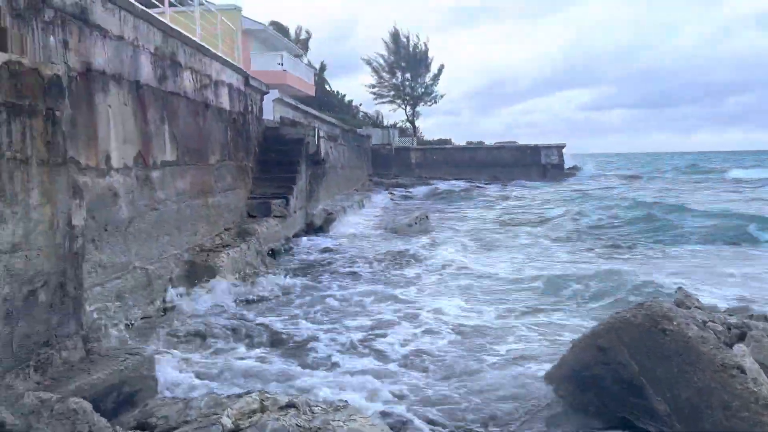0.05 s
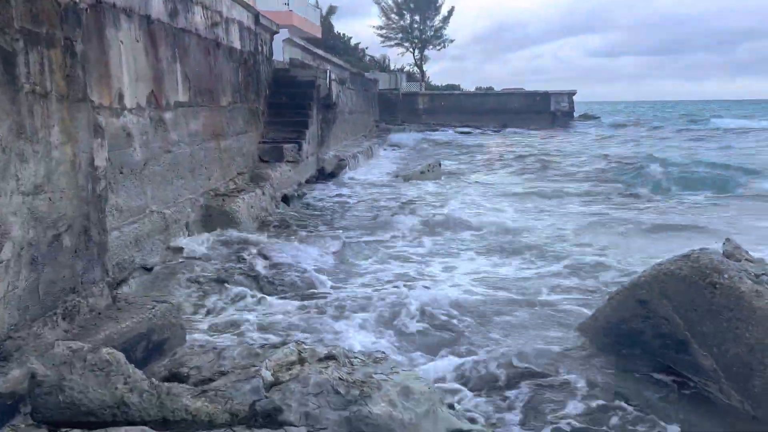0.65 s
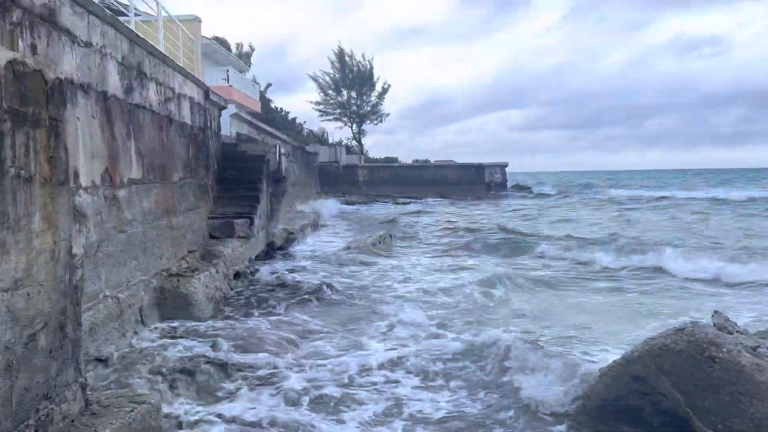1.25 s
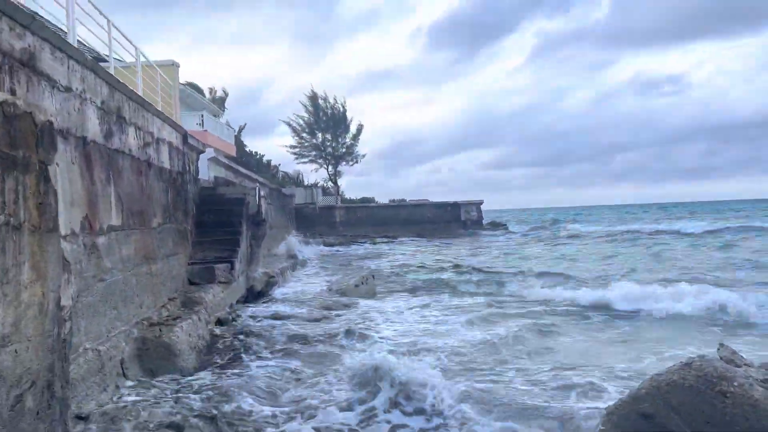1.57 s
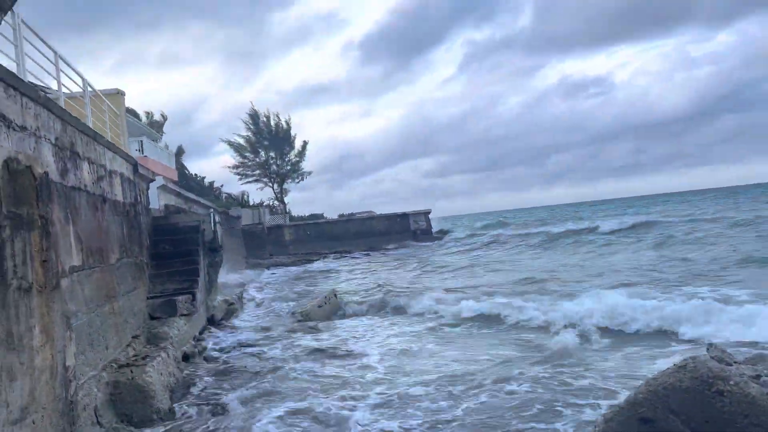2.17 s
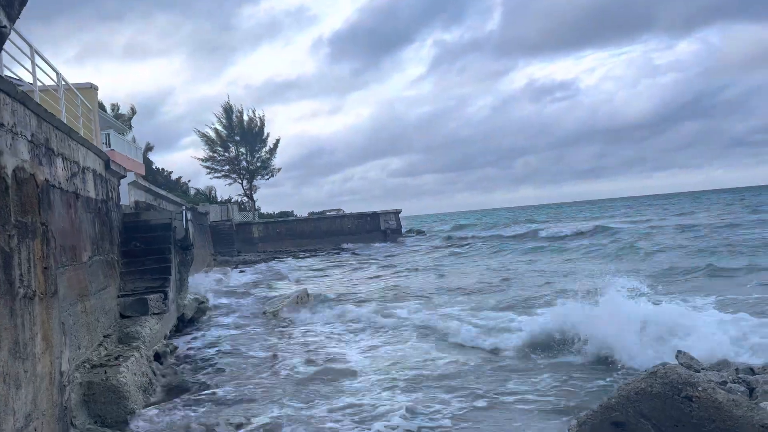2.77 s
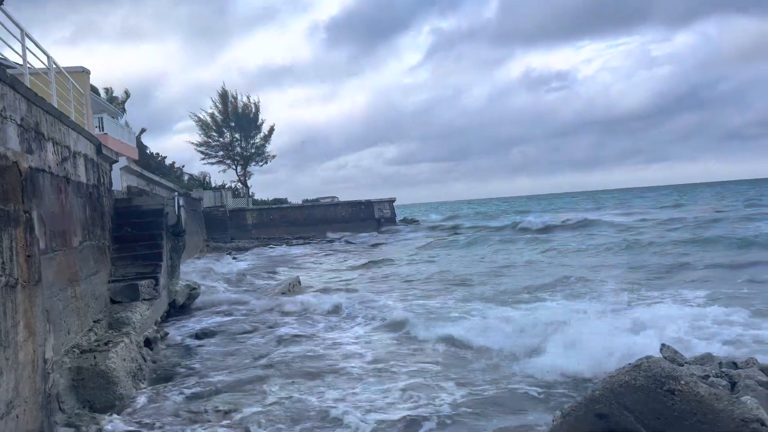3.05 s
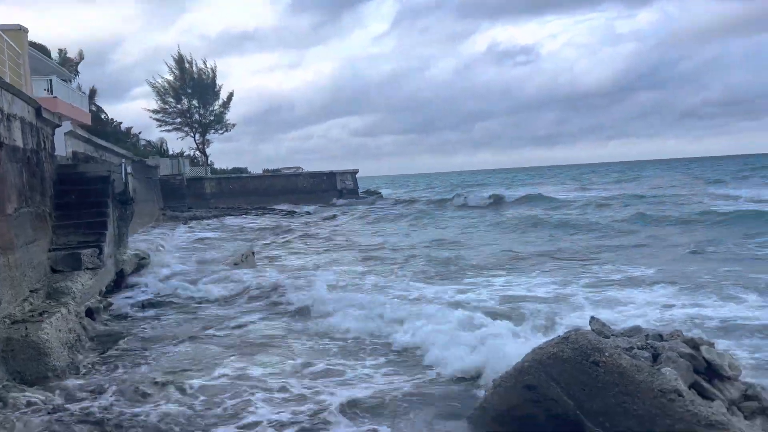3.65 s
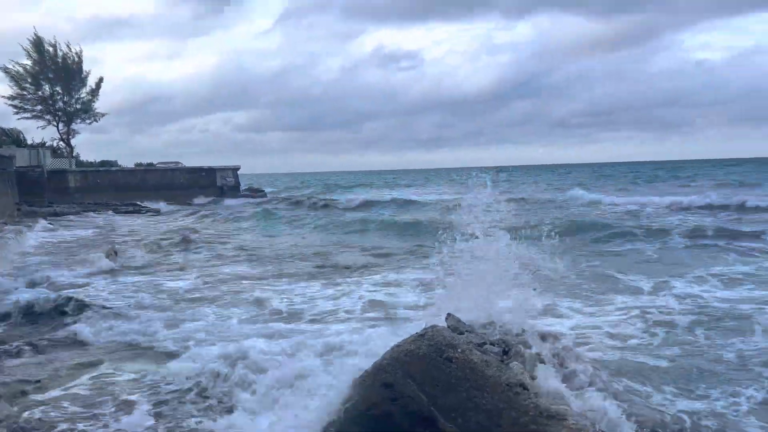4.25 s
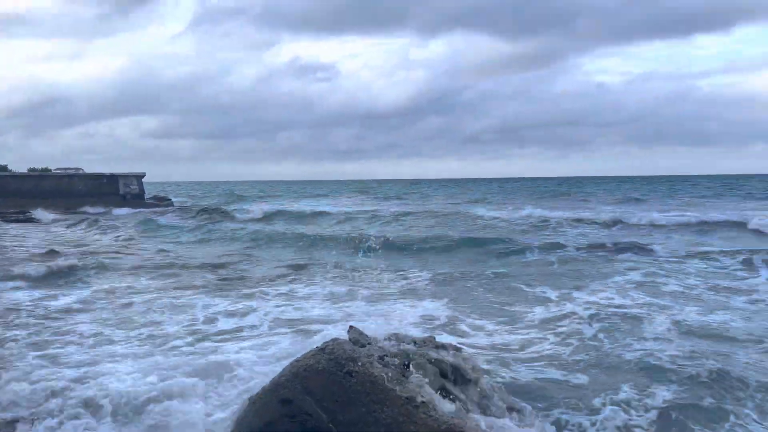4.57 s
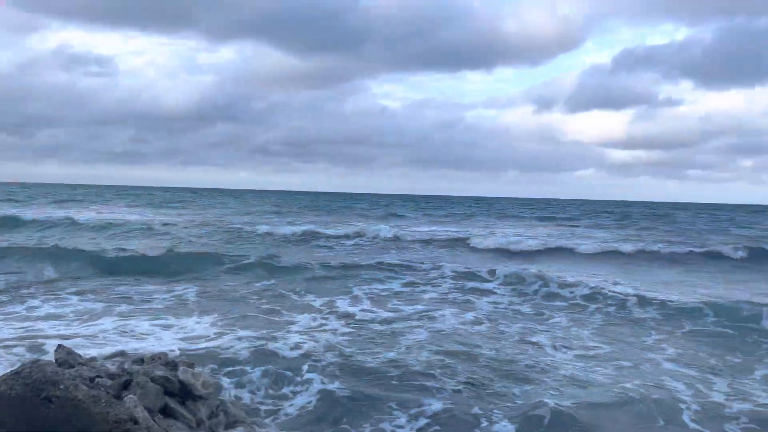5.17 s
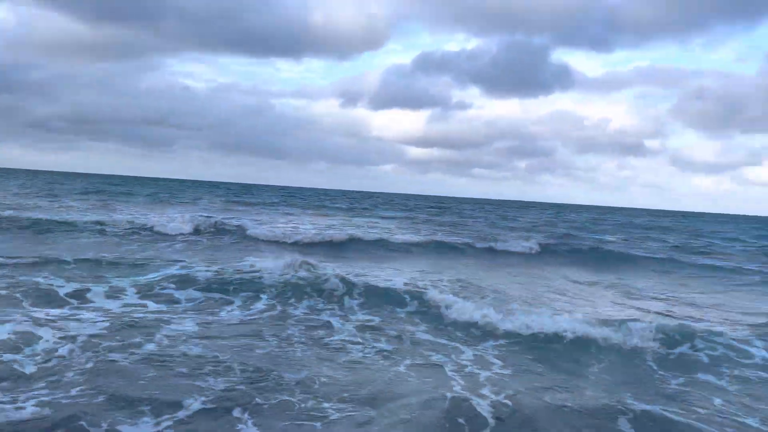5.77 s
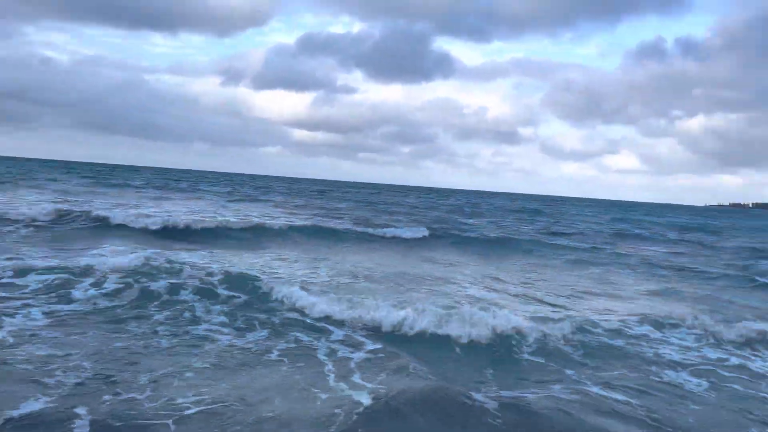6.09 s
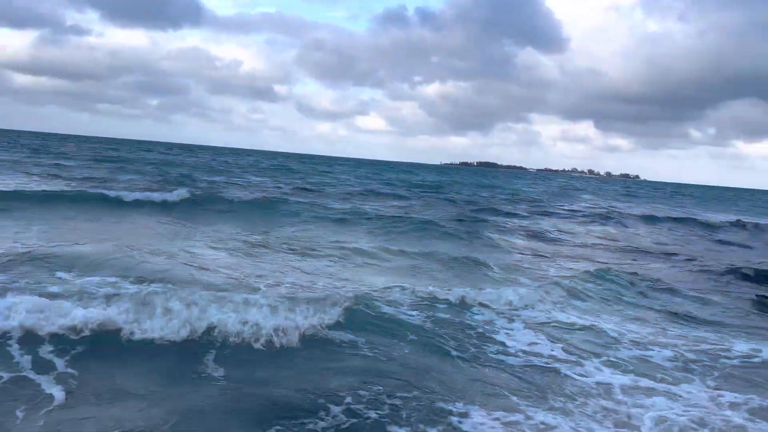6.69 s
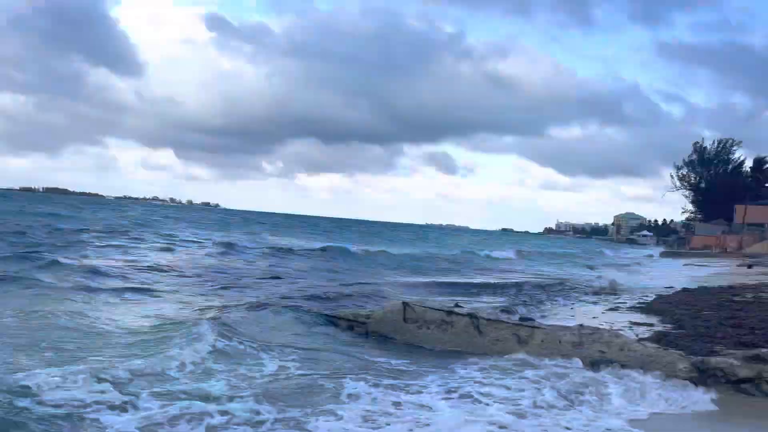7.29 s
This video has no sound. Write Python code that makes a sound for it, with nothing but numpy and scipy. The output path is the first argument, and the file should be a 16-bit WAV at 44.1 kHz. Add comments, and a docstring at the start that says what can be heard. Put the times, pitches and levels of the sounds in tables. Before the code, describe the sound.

Waves break and foam along a sea wall, with low wind rumble and thumps on the microphone growing stronger in the second half.

```python
"""Surf and wind at a sea wall

Surf runs in along a sea wall, breaks on a boulder and drains away as fizzing foam.
Clouds of bubbles roar and hiss, single ones ring out, and three drops of spray tap the microphone.
Swirls of air (eddies) thump its two openings (ports), lightly at first, then in a long gust."""
import sys
import numpy as np
from scipy import signal
from scipy.fft import rfft, irfft
from scipy.io import wavfile
from scipy.ndimage import uniform_filter1d

SR = 44100
rng = np.random.default_rng(int(sys.argv[2]) if len(sys.argv) > 2 else 0)


def log_audio(samples):
    """Write samples as a 16-bit WAV file to the path given in sys.argv[1]."""
    # one column per channel
    frames = np.atleast_2d(samples).T
    # limit to full scale, then quantise
    limited = np.clip(frames, -1, 1)
    pcm = np.round(limited * 32767).astype(np.int16)
    wavfile.write(sys.argv[1], SR, pcm)


N = 332073

# The tone of the surf, from bass to treble: pitch_hz, level_db
SURF_TONE = [(120, -4), (280, -2), (500, -3), (800, -2.5), (1200, -5), (1700, -6), (2400, -10.5),
             (3300, -14), (4300, -16.5), (5400, -17), (7200, -22), (8500, -22.5), (10000, -18.5),
             (11400, -20.5), (13000, -25), (15500, -28.5)]
# The steady wash of water between breaking waves: time_s, level_db
STEADY_WASH = [(0, -47), (.5, -46), (1.25, -41.5), (2.1, -38), (4.5, -38), (6.2, -37.5), (6.45, -37.5),
               (7.53, -36.5)]
# Deep water by the wall gives way to thin foam on the sand: time_s, roar_db, fizz_db, mist_db
SHORE_MIX = [(0, 3, 3.5, -2.5), (2.0, 2.5, -0.7, -4.5), (4.2, 1.2, 1.8, -2.2), (5.2, 9, 3, -1),
             (6.0, -4.5, 2.5, -1.7), (6.5, -5.5, 4, -4.5), (7.3, -2, 4, -4.5), (7.53, 6, 2, -7.5)]
# Waves burst on the rocks and change each part of the water's sound:
# peak_s, surge_db, rise_s, fall_s, fizz_db, ringing_db, splash_db
WAVES = [(.8, -1.4, .13, .35, -0.5, -6, 5.5), (1.42, 1.4, 0.096, 0.41, 1.1, 2, 1),
         (2.25, 2, 0.17, 0.34, 2.5, 4, -1.7), (3.3, 0.4, 0.23, 0.22, -0.5, 2, -1),
         (4.19, 1.5, .07, 0.19, .3, 3, 5), (4.85, -1.5, 0.087, 0.18, 1, 4, 4),
         (5.52, 2, 0.11, 0.28, 1.5, -1, .5), (5.92, 4.5, 0.16, 0.33, 3, -4, -2.5),
         (7.42, -2, .17, .3, 1.5, 0, 6)]
# How alike the surf is at the two ports (1 means the same): pitch_hz, likeness
SURF_LIKENESS = [(200, 0.9), (400, 0.6), (750, 0.29), (1200, 0.16), (1700, 0.58), (2500, 0.39), (3500, .04),
                 (4500, 0.26), (5200, 0.069), (6750, 0.41), (7750, 1), (8700, 1)]
# Which side the surf is louder on: pitch_hz, left_minus_right_db
SURF_PAN = [(300, 2), (750, -.5), (1400, -2.5), (2100, -3), (3000, 0.4), (4100, 1), (5400, 8), (6300, 5),
            (7200, -2.3), (10000, 0.5)]
# The microphone turns right, so the roar passes from right to left:
# time_s, right_delay_s, left_minus_right_db, likeness_gain
MIC_TURN = [(0, -0.00012, -1.7, 1.13), (2.9, -.0005, -1.5, 1.14), (4.1, 0.00049, 0, 0.85),
            (5.8, .0003, 0.7, 0.9), (6.7, .0003, 2, 1.04), (7.53, 0.0016, 1.7, 1.7)]
# Foam reaches the left port first; the finest hiss reaches both together: pitch_hz, right_delay_s
FOAM_DELAY = [(1900, .00036), (2400, .00042), (3300, .00042), (4400, .000465), (6200, .00047), (6600, 0)]
# The tone of the wind's rumble: pitch_hz, level_db
WIND_TONE = [(25, -5), (36, -12), (52, 0), (90, 2), (130, -1.5), (200, -3), (300, -7.5), (500, -12.5),
             (800, -19.5), (1200, -23.5), (2000, -44), (4000, -46)]
# How strong the wind is at the ports: time_s, level_db
WIND_STRENGTH = [(0, -38), (.2, -41.5), (.35, -42), (.45, -44), (.6, -45), (.72, -40.5), (1.5, -37),
                 (1.6, -46), (1.72, -37), (1.83, -48), (2.1, -47), (2.55, -32.5), (2.7, -34.5),
                 (3.1, -38.5), (3.42, -37), (3.62, -38), (3.95, -28.5), (4.06, -33), (4.14, -25.5),
                 (4.4, -31.5), (4.48, -37), (4.55, -26.5), (4.68, -24), (4.78, -21.5), (5.0, -21.5),
                 (5.06, -25.5), (5.17, -20.5), (5.55, -20.5), (5.72, -26.5), (5.89, -18.5), (6.1, -26),
                 (6.28, -25.5), (6.49, -37.5), (6.6, -30), (6.93, -27.5), (7.22, -27.5), (7.31, -36),
                 (7.53, -37.5)]
# Single eddies that hit the ports: peak_s, level_db, pitch_hz, length_s
EDDIES = [(0.064, -25, 230, 0.0075), (0.154, -30, 250, .0025), (0.281, -31.5, 200, .004),
          (0.344, -30.5, 171, 0.025), (0.685, -28.5, 89, 0.015), (0.712, -31, 270, .004),
          (0.748, -30, 190, 0.0056), (0.791, -35, 180, 0.0045), (1.439, -31, 230, 0.012),
          (1.519, -28.5, 170, .01), (1.698, -27, 247, 0.0074), (1.748, -29.5, 140, 0.013),
          (2.206, -28.5, 140, .008), (2.268, -21, 128, 0.0068), (2.621, -24, 191, .012),
          (2.643, -18, 227, 0.0089), (2.869, -30.5, 90, .018), (3.461, -22.5, 207, 0.0027),
          (3.563, -20, 190, 0.006), (3.618, -21.5, 159, 0.012), (3.651, -23.5, 221, 0.0093),
          (3.737, -21, 105, .012), (3.89, -21.5, 120, 0.0087), (3.942, -22, 121, 0.016),
          (4.213, -19, 115, 0.0086), (4.352, -22, 170, 0.011), (4.396, -23, 174, 0.028),
          (4.541, -16, 210, 0.0093), (4.573, -16.5, 180, 0.0034), (4.584, -17.5, 520, 0.0022),
          (4.659, -14, 150, .004), (4.767, -14.5, 148, 0.008), (4.794, -19, 470, 0.0023),
          (4.825, -14.5, 160, 0.0076), (4.946, -18, 175, 0.006), (4.969, -15.5, 198, 0.011),
          (5.013, -15.5, 160, 0.0093), (5.038, -17, 250, 0.0095), (5.121, -17, 620, 0.0011),
          (5.178, -19, 155, 0.0065), (5.198, -18.5, 238, 0.0056), (5.262, -12, 224, 0.0036),
          (5.272, -14, 480, 0.0022), (5.286, -18, 195, 0.0037), (5.361, -25, 129, 0.004),
          (5.387, -12.5, 219, 0.0038), (5.44, -22, 140, 0.003), (5.507, -17, 135, 0.0062),
          (5.533, -15, 170, .006), (5.56, -10.5, 322, 0.0018), (5.622, -17.5, 520, 0.0016),
          (5.656, -17, 190, 0.007), (5.777, -16, 377, 0.0026), (5.814, -10.5, 150, 0.0044),
          (5.839, -18, 172, .007), (6.15, -18.5, 95, .014), (6.185, -21, 105, 0.01),
          (6.241, -24, 220, 0.013), (6.572, -16.5, 138, 0.0036), (6.591, -16.5, 180, 0.021),
          (6.68, -16, 90, 0.0064), (6.775, -19.5, 125, 0.014), (6.887, -14, 80, 0.0069),
          (6.965, -15, 450, .0016), (6.971, -15.5, 170, .004), (7.061, -20.5, 290, 0.0087),
          (7.141, -24, 190, .003), (7.203, -20, 149, 0.0076), (7.243, -18, 90, 0.0082)]
# Drops hit the microphone's case, each on its own spot: start_s, level_db, hardness_hz, pitch_ratio
SPRAY_DROPS = [(4.906, -32, 5600, 1.2), (5.161, -27, 5200, 1.03), (5.177, -25.5, 8000, 1.01)]
# The notes the case rings with, and their time to fade by 60 dB: pitch_hz, level_db, ring_s
CASE_NOTES = [(3220, -8.5, 0.013), (4580, -4.5, 0.029), (6160, -10, 0.039), (8100, 2, 0.007)]
# The left channel slips behind the right in the treble: pitch_hz, delay_cycles
LEFT_DELAY = [(7100, 0), (8300, .16), (8900, .27), (9300, .5), (10800, .5), (11200, .67), (12000, .87),
              (12600, 1)]

ROAR_TOP_HZ = 1400  # below this the surf comes from the roar's direction, above it from the foam's
FOAM_LAG_S, MIST_PER_FOAM = 0.047, 0.04  # foam follows a wave this late and throws up a little mist
WAKE_DB, WAKE_S = -13.5, 0.053  # rough air around an eddy: relative level, rise and fall time
USUAL_EDDY_S = 0.0089  # WAKE_DB holds at this length; longer eddies stir up more air
NOTCH_HZ, NOTCH_Q, CUTOFF_HZ = 5460, 70, 15400  # the microphone's narrow dip and its upper limit


def surf(wash_db, fizz_db, roar_db, splash_db, mist_db, level_db, patchy_db, churn_db):
    """Countless bubbles blur into noise: low roar, splash in the middle, high fizz, mist on top."""
    out, churn, turn = 0, drift(3.2), in_time(MIC_TURN)
    edges_hz = np.concatenate([np.geomspace(70, 700, 7)[:-1], np.geomspace(700, 16500, 24)])
    for hz, pair in noise_bands(SURF_TONE, edges_hz):
        # how much this band belongs to each part of the sound
        roar = at_hz([(600, 0.68), (1600, 0.036)], hz)
        splash = at_hz([(1200, 0.2), (2000, 0.51), (2600, 0.52), (3600, 0.15), (5000, 0.076)], hz)
        fizz = at_hz([(2200, 0.014), (5000, 0.84)], hz)
        mist = at_hz([(6500, 0.17), (11000, 1)], hz)
        tone_db = roar * roar_db + splash * splash_db + fizz * fizz_db + mist * mist_db
        # few big bubble clouds sound at once, so the roar wavers more than the foam
        waver_db = patchy_db * (1 - fizz / 2) * drift(21.5) + churn_db * churn
        out = out + from_db(level_db + wash_db + tone_db + waver_db) * surf_at_ports(pair, hz, turn)
    return out


def breaking_waves():
    """Each wave shifts the level (dB) of the wash, bubbles and splash, and a moment later the foam."""
    surge_db = ringing_db = splash_db = foam_db = 0
    for peak_s, wave_db, rise_s, fall_s, fizz_db, bubbles_db, spatter_db in WAVES:
        burst = bump(peak_s, rise_s, fall_s)
        surge_db += wave_db * burst
        ringing_db += bubbles_db * burst
        splash_db += spatter_db * burst
        foam_db += fizz_db * bump(peak_s + FOAM_LAG_S, rise_s, fall_s)
    return surge_db, ringing_db, splash_db, foam_db


def surf_at_ports(pair, hz, turn):
    """One band of surf reaches the two ports partly alike, later at one and louder at one."""
    roar_delay_s, pan_db, likeness_gain = turn
    turn_share = at_hz([(3300, 0.78), (5000, 0.3), (7000, 0.081)], hz)
    left, right = stereo(pair, at_hz(SURF_LIKENESS, hz) * (1 + turn_share * (likeness_gain - 1)))
    delay_s = roar_delay_s if hz < ROAR_TOP_HZ else at_hz(FOAM_DELAY, hz)
    samples = np.arange(N)
    delayed_right = np.interp(samples - delay_s * SR, samples, right)
    lean_left = from_db((at_hz(SURF_PAN, hz) + turn_share * pan_db) / 2)
    return np.array([left * lean_left, delayed_right / lean_left])


def bubbles(wash_db, per_s, spread_db, cycles, octave_db, level_db, pitches=26):
    """Nearby bubbles ring briefly, each with its own strength and place; higher ones are weaker."""
    out = np.zeros((2, N))
    for hz in np.geomspace(500, 6000, pitches):
        starts = np.flatnonzero(rng.random(N) < per_s / pitches / SR)
        size, sign, place = rng.random((2048, 3))[:len(starts)].T
        strength = from_db(spread_db * np.minimum(-np.log(size), 4)) * np.sign(sign - 0.5)
        clicks = np.zeros((2, N))
        clicks[:, starts] = strength * [np.cos(place * np.pi), np.sin(place * np.pi)]
        out += from_db(octave_db * np.log2(hz)) * ring(clicks, hz, cycles / hz)
    return from_db(wash_db + level_db) * rms_one(out)


def wind(gust_db, level_db, lump_db, flutter_db, patchy_db, alike_low, alike_high,
         brightening, strong_db, steady_s):
    """Rough air rumbles at the ports: a long gust sheds smaller eddies in short flurries."""
    out, lumps, flutter = 0, drift(16), drift(56)
    excess_db = uniform_filter1d(gust_db, size=SR // 3) - strong_db
    for hz, pair in noise_bands(WIND_TONE, np.geomspace(22, 4000, 16)):
        smallness = at_hz([(90, 0.048), (600, 0.98)], hz)
        flurry = from_db(lump_db * lumps + flutter_db * smallness * flutter + patchy_db * drift(18))
        flurry /= np.sqrt(uniform_filter1d(flurry ** 2, size=SR // 6))
        # stronger wind favours the small eddies, so it sounds brighter
        tilt = at_hz([(45, -1.4), (100, 0.24), (600, 1.2)], hz)
        gain = from_db(tilt * brightening * excess_db) * flurry
        out = out + gain * stereo(pair, alike_low + smallness * (alike_high - alike_low))
    # over spans longer than steady_s, the gust sets the level
    power = uniform_filter1d(np.mean(out ** 2, axis=0), size=int(steady_s * SR))
    return from_db(gust_db + level_db) * out / np.sqrt(power)


def gusts():
    """The rumble's strength in dB: the wind plus the rough air that travels with each eddy."""
    wind_db, = in_time(WIND_STRENGTH)
    wake_power = 0
    for peak_s, level_db, _, length_s in EDDIES:
        strength = length_s / USUAL_EDDY_S * from_db(level_db + WAKE_DB)
        wake_power += (strength * bump(peak_s, WAKE_S, WAKE_S)) ** 2
    return 10 * np.log10(from_db(wind_db) ** 2 + wake_power)


def eddy_thumps(rough_db, width_ratio, alike, size=8192):
    """Each eddy is one swing of pressure at both ports inside a rough thud; the smallest ones pop."""
    out = np.zeros((2, N + 2 * size))
    t = (np.arange(size) - size // 2) / SR
    for peak_s, level_db, hz, length_s in EDDIES:
        swell = np.exp(-np.abs(t) / length_s - (t / length_s / 4) ** 2)
        puff = rng.standard_normal((2, size)) * swell
        thud = stereo(band(puff, hz / width_ratio, hz * width_ratio), alike)
        # big, slow swirls carry most of the pressure, so soften the highs
        thud = signal.sosfilt(signal.butter(1, hz, fs=SR, output="sos"), thud)
        thud = rms_one(thud) * np.sqrt(np.mean(swell ** 2))
        # as the centre passes, the pressure goes one way and then the other
        passing = 2 * np.pi * hz * t
        swing = rng.choice([-1, 1]) * passing * np.exp(1 - np.abs(passing))
        start = round(peak_s * SR) + size // 2
        out[:, start:start + size] += from_db(level_db) * (swing + from_db(rough_db) * thud)
    return out[:, size:size + N]


def spray_taps(level_db):
    """A drop makes the microphone's case ring briefly; a soft drop barely stirs the high notes."""
    out = np.zeros(N)
    for start_s, drop_db, hardness_hz, pitch_ratio in SPRAY_DROPS:
        tap = np.zeros(N)
        tap[round(start_s * SR)] = from_db(level_db + drop_db)
        for hz, note_db, ring_s in CASE_NOTES:
            strength = from_db(note_db) / (1 + (hz / hardness_hz) ** 6)
            out += strength * ring(tap, hz * pitch_ratio, ring_s)
    return out * from_db([[2], [-3]])  # louder on the left


def from_db(db):
    """Turn decibels into a number to multiply by."""
    return np.exp(np.asarray(db) * (np.log(10) / 20))


def rms_one(x):
    """Scale a signal so its average strength (rms) is 1."""
    return x / np.sqrt(np.mean(x ** 2) + 1e-20)


def in_time(rows):
    """Join a table's rows with straight lines: one curve for each column after time_s."""
    times_s, *columns = np.transpose(rows)
    return [np.interp(np.arange(N) / SR, times_s, column) for column in columns]


def at_hz(points, hz):
    """Look up a value by pitch, with octaves evenly spaced."""
    pitches_hz, values = np.transpose(points)
    return np.interp(np.log(hz), np.log(pitches_hz), values)


def bump(peak_s, rise_s, fall_s):
    """A smooth rise to 1 at peak_s, then a smooth fall."""
    t = np.arange(N) / SR - peak_s
    width_s = np.where(t < 0, rise_s, fall_s)
    return np.exp(-np.minimum((t / width_s) ** 2, 50))


def drift(rate_hz):
    """A smooth random wobble, about 1 in size, that changes roughly rate_hz times a second."""
    step, warm_up = 40, 2000  # one point every 40 samples; the first points are thrown away
    decay = np.exp(-2 * np.pi * rate_hz * step / SR)
    noise = rng.standard_normal(N // step + warm_up + 2)
    slow = signal.lfilter([1], [1, -2 * decay, decay * decay], noise)[warm_up:]
    return np.interp(np.arange(N) / step, np.arange(len(slow)), rms_one(slow))


def band(x, low_hz, high_hz):
    """Keep the sound between two pitches."""
    edges_hz = [low_hz, min(high_hz, 0.45 * SR)]
    return signal.sosfilt(signal.butter(2, edges_hz, "band", fs=SR, output="sos"), x)


def ring(clicks, hz, ring_s):
    """Each click starts a pure tone that fades by 60 dB in ring_s."""
    decay, angle = from_db(-60 / (ring_s * SR)), 2 * np.pi * hz / SR
    feedback = [1, -2 * decay * np.cos(angle), decay * decay]
    return signal.lfilter([0, np.sin(angle)], feedback, clicks + 1e-18)


def stereo(pair, alike):
    """Mix two unrelated signals into left and right: alike is 0 for unrelated, 1 for the same."""
    alike = np.clip(alike, -1, 1)
    return np.sqrt((1 + alike) / 2) * pair[0] + np.sqrt((1 - alike) / 2) * pair[1] * [[1], [-1]]


def noise_bands(tone, edges_hz):
    """Give each band's centre pitch and two unrelated noises, as loud as the tone table asks."""
    white = rng.standard_normal((2, 2, N))
    centres_hz = np.sqrt(edges_hz[1:] * edges_hz[:-1])
    power = from_db(at_hz(tone, centres_hz)) ** 2 * np.diff(edges_hz)
    for k, hz in enumerate(centres_hz):
        pair = rms_one(band(white[k % 2], edges_hz[k], edges_hz[k + 1]))
        yield hz, np.sqrt(power[k] / power.sum()) * pair


def scene():
    """Water in front, wind and spray on the microphone itself."""
    steady_db, = in_time(STEADY_WASH)
    roar_db, fizz_db, mist_db = in_time(SHORE_MIX)
    surge_db, ringing_db, splash_db, foam_db = breaking_waves()
    wash_db = steady_db + surge_db
    fizz_db = fizz_db + foam_db - surge_db  # the fizz follows the foam more than the wave itself
    mist_db = mist_db + MIST_PER_FOAM * foam_db
    water = surf(wash_db, fizz_db, roar_db, splash_db, mist_db, level_db=6, patchy_db=1.77, churn_db=0.5)
    water += bubbles(wash_db + ringing_db, per_s=800, spread_db=5.5, cycles=20,
                     octave_db=-3.5, level_db=-7.5)
    air = wind(gusts(), level_db=1, lump_db=2, flutter_db=3, patchy_db=1.5,
               alike_low=0.72, alike_high=0.5, brightening=0.26, strong_db=-24, steady_s=0.12)
    air += eddy_thumps(rough_db=-1.5, width_ratio=2.02, alike=0.83)
    return water + air + spray_taps(level_db=4.5)


def record(dry):
    """The microphone delays the left treble and cuts a narrow band, the deepest bass and the top."""
    pitches_hz = np.arange(N + 1) * SR / (2 * N)
    delay_cycles = np.interp(pitches_hz, *np.transpose(LEFT_DELAY))
    left = irfft(rfft(dry[0], 2 * N) * np.exp(-2j * np.pi * delay_cycles))[:N]
    notched = signal.lfilter(*signal.iirnotch(NOTCH_HZ, NOTCH_Q, fs=SR), [left, dry[1]])
    bass_cut = signal.sosfilt(signal.butter(4, 40, "high", fs=SR, output="sos"), notched)
    return signal.sosfilt(signal.ellip(12, 0.1, 80, CUTOFF_HZ, fs=SR, output="sos"), bass_cut)


dry = scene()
out = record(dry)
log_audio(out)
```